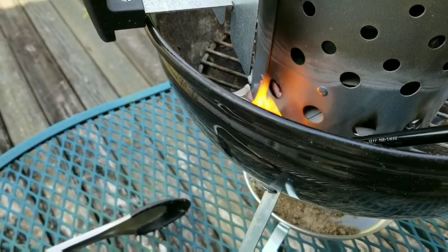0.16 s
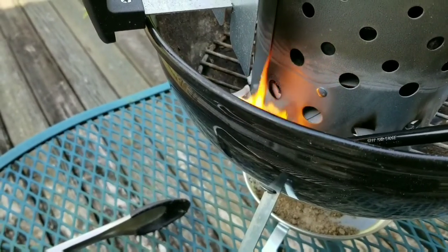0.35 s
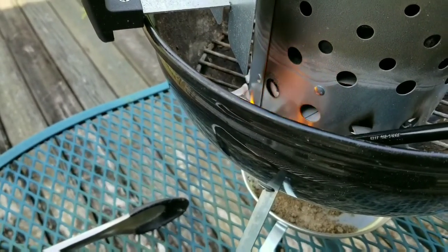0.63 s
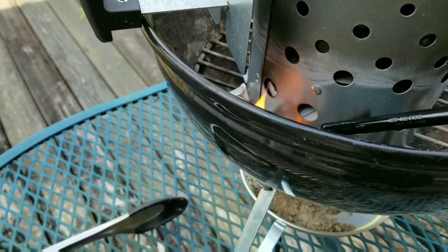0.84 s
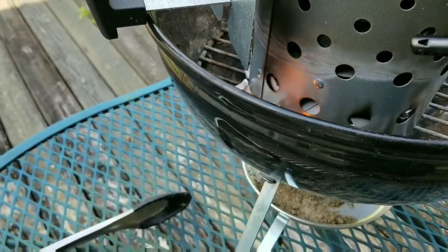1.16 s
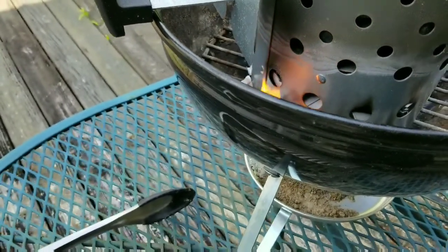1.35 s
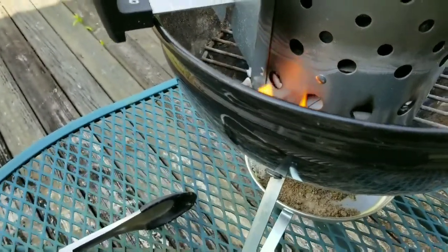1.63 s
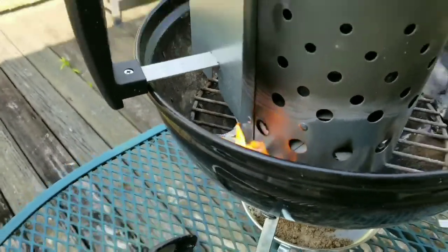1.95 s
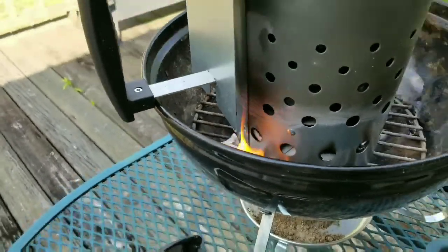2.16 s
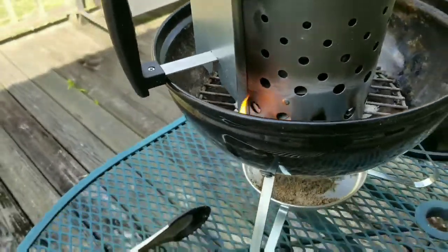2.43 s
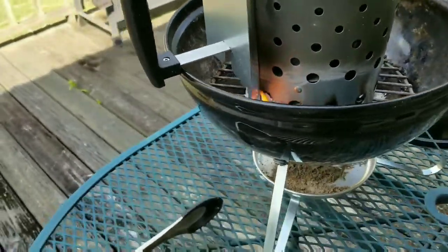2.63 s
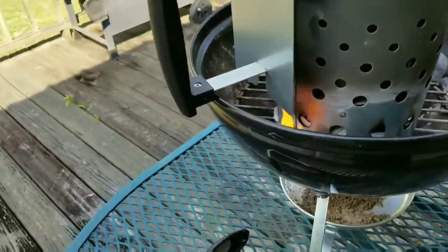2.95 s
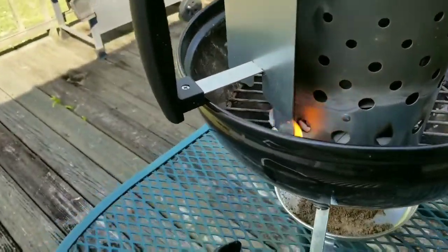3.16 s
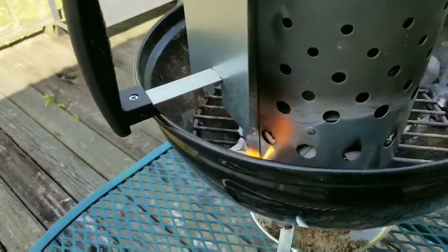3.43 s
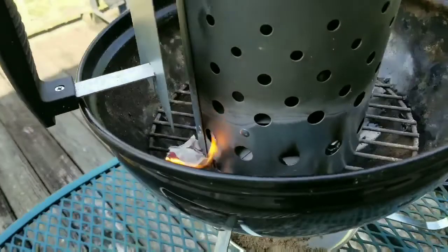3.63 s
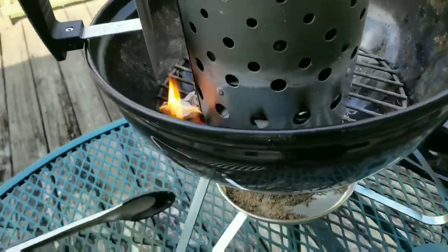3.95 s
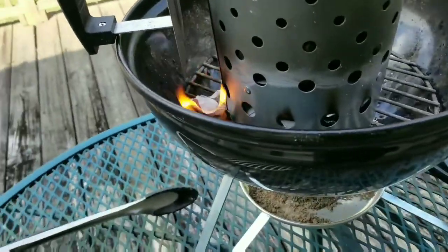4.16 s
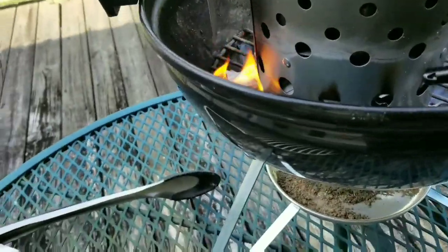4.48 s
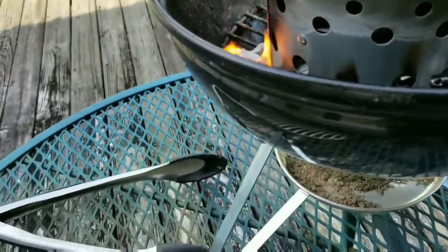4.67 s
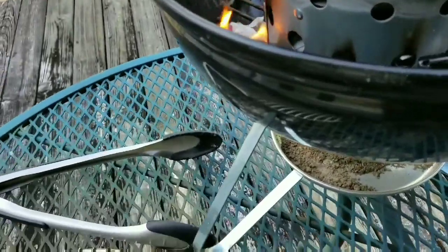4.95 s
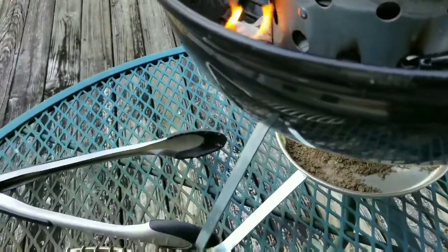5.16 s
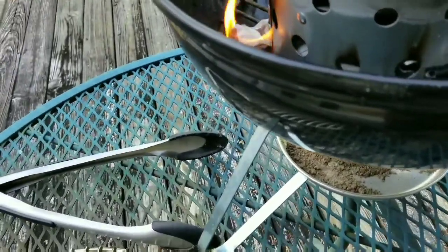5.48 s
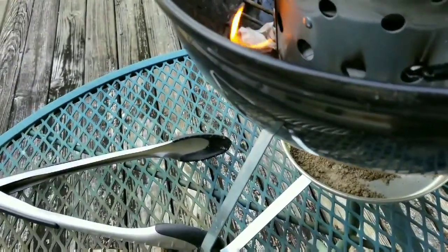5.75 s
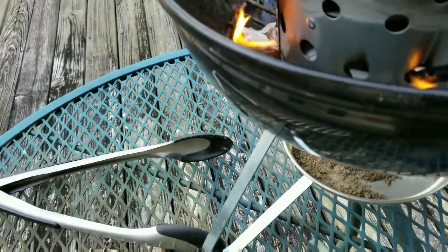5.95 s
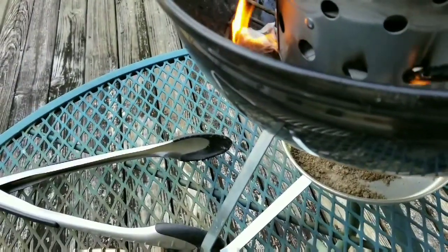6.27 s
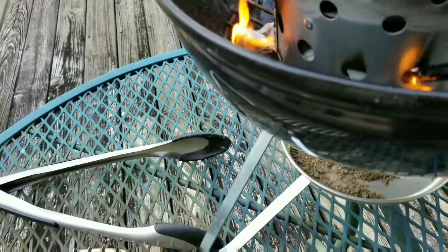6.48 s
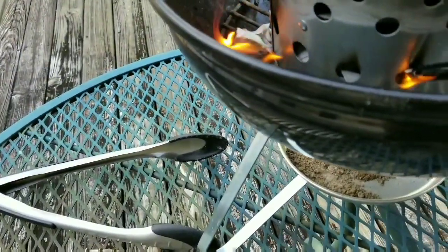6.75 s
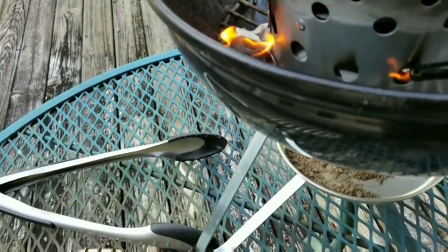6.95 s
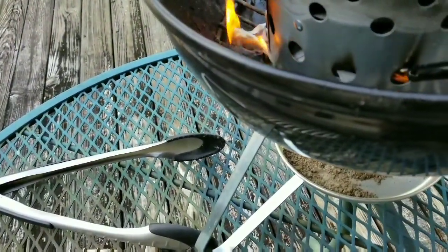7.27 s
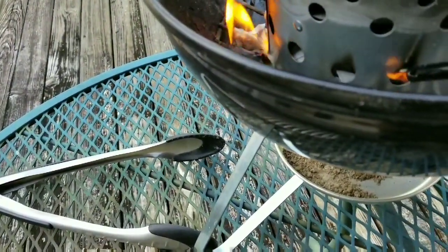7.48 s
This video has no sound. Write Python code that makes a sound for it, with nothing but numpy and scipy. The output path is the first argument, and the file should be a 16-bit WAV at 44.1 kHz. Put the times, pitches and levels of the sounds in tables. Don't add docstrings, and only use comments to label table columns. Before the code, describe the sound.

Close outdoor stereo on a deck, with a far fan's low unsteady hum and thin hiss. From 0.2 to 0.95 s burning paper crackles: sharp dry snaps at 0.46 and 0.58, the loudest at 0.64, another at 0.81, each with a brief diffuse tail. It then stays quiet, with a dull tick at 1.76 and faint cloth rustles around 1.8 to 2.5. A strong crack lands at 3.2, small crackles follow, and from 4.1 to 4.85 they cluster densely. Wind arrives at about 4.6, thumping low and irregularly, mostly on the right. A lighter taps the steel chimney at 4.85 with a short bright ring, lightly at 5.4, and with a hard dull knock at 5.83. The hum drops after 4.9. From 6 s only tiny ember ticks and buffeting remain, with a lull at 7 and gusts returning to the end at 7.6.

```python
import sys
import numpy as np
from scipy import signal
from scipy.fft import rfft, irfft, next_fast_len
from scipy.io import wavfile
from scipy.ndimage import uniform_filter1d, map_coordinates

SR = 44100
rng = np.random.default_rng(int(sys.argv[2]) if len(sys.argv) > 2 else 0)


def convert_level_to_amplitude(level_db):
    exponent = np.asarray(level_db, float) / 20
    return 10 ** exponent


def put_to_file(sound):
    columns = np.atleast_2d(sound).T
    safe = np.clip(columns, -1, 1)
    whole_steps = np.round(safe * 32767)
    wavfile.write(sys.argv[1], SR, whole_steps.astype(np.int16))


N = 335601

# start in seconds, ring level in dB, knock level in dB,
# tilt of the ring in dB per octave.
STROKES = [
    (4.848, -45, -34, -1),
    (5.832, -45.5, -23, -1.5),
    (5.394, -52, -54, -2),
]
# time in seconds, level in dB.
BREEZE_LEVEL = [
    (4.4, -88),
    (4.65, -37),
    (4.9, -40),
    (6, -42.5),
    (6.8, -43.5),
    (7, -53.5),
    (7.3, -44),
    (7.61, -38),
]
# frequency in Hz, width in Hz, gain in dB.
PORT_MODES = [(3940, 200, -2.5), (8100, 470, -2.5), (12260, 350, 8)]


def unit(x):
    return x / np.sqrt(np.mean(x ** 2) + 1e-20)


def along(points, hz):
    f, v = np.transpose(points)
    return np.interp(np.log(hz + 1), np.log(f + 1), v)


def curve(rows, column=1):
    rows = np.array(rows)
    return np.interp(np.arange(N) / SR, rows[:, 0], rows[:, column], left=-150, right=-150)


def wobble(rate):
    knots = rng.standard_normal(int(N * rate / SR) + 4)
    return map_coordinates(knots, [np.arange(N) * rate / SR])


def filtered(x, response):
    n = x.shape[-1]
    m = next_fast_len(n + 4096)
    return irfft(rfft(x, m) * response(np.fft.rfftfreq(m, 1 / SR)), m)[..., :n]


def causal(gain):
    cepstrum = irfft(np.log(gain + 1e-6))
    half = len(cepstrum) // 2
    cepstrum[1:half] *= 2
    cepstrum[half + 1:] = 0
    return np.exp(rfft(cepstrum))


def peak(f, hz, width):
    return 1j * f * width / (hz * hz - f * f + 1j * f * width)


def rush(gain, alike, patchy_db=0):
    pair = rng.standard_normal((2, N))
    if patchy_db:
        z = signal.stft(pair, nperseg=512)[2]
        field = uniform_filter1d(rng.standard_normal(z.shape[1:]), size=6, axis=0)
        field = uniform_filter1d(field, size=12, axis=1)
        pair = signal.istft(z * convert_level_to_amplitude(patchy_db * unit(field)), nperseg=512)[1][:, :N]

    def mid_side_gain(hz):
        turn = np.arccos(np.clip(along(alike, hz), -1, 1)) / 2
        return gain(hz) * [np.cos(turn), np.sin(turn)]

    mid, side = filtered(pair, mid_side_gain)
    return unit(np.array([mid + side, mid - side]))


def add(out, s, sound):
    at = round(s * SR)
    out[..., at:at + sound.shape[-1]] += sound[..., :N - at]


def from_fire(sound, own, share=0.46):
    # frequency in Hz, level in dB.
    shadow_gain = [(1200, 0.5), (2500, -4), (12000, -6.5)]
    share = np.clip(share, 0, 1)
    mixed = share * sound + np.sqrt(1 - share ** 2) * own
    late = np.pad(mixed, (19, 0))[:len(sound)]
    return np.array([filtered(late, lambda f: convert_level_to_amplitude(along(shadow_gain, f))), sound])


def even(burst):
    lines = rfft(burst)
    return irfft(lines * causal(uniform_filter1d(abs(lines) ** 2, size=16) ** -.5))


def snaps():
    # start in seconds, peak in dB, ringing in Hz, brightness in dB, body in dB.
    loud_snaps = [(0.4578, -16, 2300, 2, 3), (0.5822, -25, 3200, -6, -6.5), (0.6413, -5, 3300, -4, -4),
                  (0.81, -18, 2250, -2, -4), (3.215, -10.5, 2270, 3, -3), (4.093, -26, 8180, -4.5, -10),
                  (4.2095, -23, 5900, -3, -11), (4.3304, -18, 3730, -4.5, -8), (4.4306, -26, 3210, -3, -6),
                  (4.435, -22, 2460, 0, -6), (4.4797, -27, 4100, 0.5, 1), (4.5979, -15, 2700, 0, -7.5),
                  (4.7238, -19, 3420, -3.5, -5), (4.7394, -22.5, 3040, 2, -7), (4.7575, -28, 3340, -5, 0),
                  (4.7797, -26.5, 3510, -6, -7), (4.791, -28, 2260, -2, 2), (4.83, -27, 3680, -3, -1),
                  (4.8336, -26, 8290, -2.5, -3), (4.848, -11, 7300, -0.5, -8), (5.3943, -29, 3100, -12, -8),
                  (5.4821, -18.5, 2170, -3, -11), (5.8321, -13.5, 8100, 4, -6), (1.7575, -34, 1900, -20, 4)]
    # start in seconds, peak in dB, ringing in Hz, brightness in dB.
    small_crackles = [(0.2091, -36.5, 4040, -2), (0.5117, -29, 2370, -6), (0.526, -29, 2760, -6),
                      (0.5363, -32, 2860, -7), (0.566, -33, 2890, -16), (0.6187, -39, 3170, -16),
                      (0.7226, -42, 6000, -3), (0.8165, -36, 2300, -8), (0.915, -32.5, 2200, -10),
                      (0.946, -40, 7200, 1.5), (2.1326, -45, 2000, -12), (3.303, -36, 1900, -8),
                      (3.3632, -41.5, 3450, -7), (3.3888, -38, 5000, -3), (3.782, -38, 2710, -8),
                      (3.9562, -40, 2450, -8), (3.987, -40.5, 2500, -8), (4.1125, -43, 6500, 0),
                      (4.121, -39, 2280, -8), (4.139, -41, 7500, 0), (4.1675, -37, 3550, -4),
                      (4.1926, -33, 3800, -10), (4.1955, -34, 3900, -10), (4.2187, -40, 7560, 0),
                      (4.3075, -40, 1920, -12), (4.3345, -26, 7900, -2), (4.358, -42, 8200, 3),
                      (4.6912, -32, 2500, -2), (4.7102, -32.5, 2350, -6), (4.7305, -33, 2400, -14),
                      (5.3611, -35.5, 2260, -3), (5.3735, -33, 3420, -4), (5.383, -43, 4000, -6),
                      (5.3975, -30, 3074, -14), (5.401, -33, 3074, -14), (5.4165, -40, 8500, 2),
                      (5.489, -39, 1500, -16), (5.5104, -39, 4260, -4), (5.5627, -48, 2470, -12),
                      (5.6985, -48, 8000, 0), (5.7026, -33, 1950, -3), (5.7722, -40, 2090, -5),
                      (5.8135, -47, 2170, -10)]
    # frequency in Hz, density in dB per Hz.
    snap_spectrum = [(290, -34), (600, -8), (1100, 0.5), (1600, -2.5), (2300, -0.5), (3700, -2), (6000, -6),
                     (8100, -1), (9200, -7.5), (13800, -4.5), (16200, -10), (16700, -71)]
    # frequency in Hz, t60 in seconds.
    answer_t60 = [(600, 0.22), (2000, 0.24), (6000, 0.24), (15000, 0.18)]
    # frequency in Hz, gain in dB.
    answer_tone = [(800, 0), (1150, -5), (1600, 1.5), (2500, 0.5), (9000, -4), (15700, -3.5), (15900, -40)]
    crackle_body_db, crackle_scatter_db = -.5, 2.5
    hold_s, crack_t60_s, rattle_t60_s, rattle = .0014, .011, .03, .1
    answer_db, answer_growth, steel_answer_db = -48, 0.56, 9.5

    out, t = np.zeros((2, N)), np.arange(9216) / SR
    body = crackle_body_db + crackle_scatter_db * rng.standard_normal(len(small_crackles))
    rows = list(loud_snaps) + [(*row, body_db) for row, body_db in zip(small_crackles, body)]

    f, frames, z = signal.stft(rng.standard_normal((len(rows), 2, len(t))), SR, nperseg=256)
    held_s = .045
    fade = convert_level_to_amplitude(-60 * np.maximum(frames - held_s, 0) / along(answer_t60, f)[:, None])
    answers = signal.istft(z * fade, SR, nperseg=256)[1][..., :len(t)]
    answers = answers * (1 - np.exp(-t / .007))

    u = t[:2048]
    after = np.maximum(u - hold_s, 0)
    shape = convert_level_to_amplitude(-60 * after / crack_t60_s) + rattle * convert_level_to_amplitude(-60 * after / rattle_t60_s)
    shape = shape + 1.6 * convert_level_to_amplitude(-60 * u / .003)
    shape = shape * (1 - np.exp(-u / .0001))
    size = (len(rows), 2, len(u))
    spikes = convert_level_to_amplitude(3 * rng.standard_normal(size))
    bursts = rng.standard_normal(size) * spikes * shape

    for (s, db, hz, bright_db, body_db), burst, answer in zip(rows, bursts, answers):
        on_steel = min(abs(s - stroke[0]) for stroke in STROKES) < .004
        tilt = [(700, body_db + 11), (1150, body_db + 8), (1500, body_db + 3), (1900, 0.00092),
                (3200, 0), (9000, 1.2 * bright_db + 3)]

        def own_ring(f):
            return abs(peak(f, hz, 0.11 * hz))

        def colour(f):
            return convert_level_to_amplitude(along(snap_spectrum, f)) * convert_level_to_amplitude(along(tilt, f)) * (1 + 1.9 * own_ring(f))

        def answer_colour(f):
            return colour(f) * convert_level_to_amplitude(along(answer_tone, f)) / (1 + 1.3 * own_ring(f))

        burst = filtered(np.array([even(b) for b in burst]), lambda f: causal(colour(f)))
        add(out, s, convert_level_to_amplitude(db + .5) * from_fire(*burst) / abs(burst).max())
        answer = filtered(answer, answer_colour)
        level_db = answer_db + answer_growth * db + steel_answer_db * on_steel
        add(out, s, convert_level_to_amplitude(level_db) * answer / answer[:, :2048].std())
    return out


def ticks():
    # start in seconds, peak in dB, frequency in Hz.
    ember_ticks = [(6.0104, -57, 12200), (6.0352, -60, 3570), (6.0496, -57, 13000), (6.0604, -58, 5610),
                   (6.0934, -60, 12200), (6.136, -58, 13000), (6.2238, -57, 14000), (6.2522, -53, 14400),
                   (6.2604, -53, 4300), (6.3126, -58, 3810), (6.3464, -60, 3670), (6.3684, -56, 4560),
                   (6.3744, -57, 3960), (6.4991, -53, 4750), (6.5114, -52, 3840), (6.5504, -63, 7640),
                   (6.5874, -54, 13000), (6.5989, -42, 13000), (6.6248, -54, 13100), (6.6513, -61, 12600),
                   (6.8977, -64, 12400), (7.0115, -58, 13900), (7.0618, -60, 12900), (7.0764, -60, 14000),
                   (7.0918, -58, 11100), (7.1034, -64, 12600), (7.1796, -58, 3860), (7.226, -55, 12900),
                   (7.2744, -54, 12700), (7.2874, -55, 7800), (7.3054, -61, 4360), (7.3317, -60, 3800),
                   (7.3554, -65, 12200), (7.3931, -64, 12200), (7.442, -52, 13700), (7.4584, -62, 3780),
                   (7.4844, -59, 12900), (7.5114, -64, 3590), (7.5542, -60, 12500), (7.5644, -65, 12200)]
    out, t = np.zeros((2, N)), np.arange(512) / SR
    for s, db, hz in ember_ticks:
        def colour(f):
            return (peak(f, hz, .3 * hz) + 0.6 * peak(f, 10000, 9000)) * peak(f, 8100, 12000) * (f < 16000)

        tick = filtered(rng.standard_normal((2, len(t))) * convert_level_to_amplitude(-60 * t / .012), colour)
        add(out, s + .0008, convert_level_to_amplitude(db + 4) * tick / abs(tick).max())
    return out


def steel():
    # frequency in Hz, level in dB, t60 in seconds.
    wall_modes = [(1690, -5.5, .55), (1825, -8, .14), (2083, -8, .26), (2202, -8, .14), (2462, -2, .3),
                  (3074, -4, .19), (3590, -5, .13), (3704, -6, .14), (4075, -11, .22), (4786, -8, .14),
                  (5265, -8, .16), (5615, -12, .19), (6850, -7, .14), (7348, -5, .15), (8037, -12, .18),
                  (9600, -15, .2), (10220, -12, .15), (11500, -14, .17)]
    beat_hz, beat_depth = 3, .6
    out, t = np.zeros((2, N)), np.arange(SR // 3) / SR
    for s, db, knock_db, tilt_db in STROKES:
        for hz, level_db, t60 in wall_modes:
            phase = rng.uniform(0, 2 * np.pi) + rng.normal(0, .6, (2, 1))
            scatter_db = rng.normal(0, 1.5, (2, 1))
            drift = np.cumsum(rng.normal(0, .024, len(t)))
            ring = np.sin(2 * np.pi * hz * t + phase + drift) * (1 - np.exp(-t / .003))
            ring *= 1 + beat_depth * np.cos(2 * np.pi * beat_hz * t)
            start_db = db + level_db + tilt_db * np.log2(hz / 2500) + scatter_db
            add(out, s, convert_level_to_amplitude(start_db - 60 * t / t60) * ring)
        thud = rng.standard_normal((2, len(t))) * convert_level_to_amplitude(-60 * t / .06)
        thud = filtered(thud, lambda f: peak(f, 360, 705) ** 2)
        add(out, s, convert_level_to_amplitude(knock_db) * convert_level_to_amplitude([[-6], [0]]) * thud / abs(thud).max())
    return out


def rustles():
    # centre in seconds, length in seconds, level in dB, tilt in dB from band to band.
    cloth_swells = [(0.027, 0.03, -89, -5), (1.52, .04, -74, 0), (1.805, 0.025, -59, -6.5),
                    (1.878, .04, -72, -4), (2.109, 0.045, -68, -6), (2.318, 0.039, -71, 6),
                    (2.418, 0.027, -62.5, 4), (2.515, 0.04, -69, -9), (3.064, 0.036, -65, -2),
                    (3.36, 0.053, -72, -1), (3.62, 0.04, -76, -10), (3.75, 0.043, -67, -0.5),
                    (3.845, 0.03, -59, -5), (3.95, 0.043, -69.5, -4), (4.145, 0.012, -76, -14),
                    (4.29, 0.036, -68, -3), (4.38, 0.05, -65.5, 0.5), (4.48, 0.053, -62, -3),
                    (4.625, 0.02, -62, -10), (4.56, .04, -68, 0), (4.145, .03, -70, -1),
                    (5.248, 0.12, -82.5, -10.5), (6.05, 0.056, -76.5, -1), (6.298, 0.072, -79, 3),
                    (6.518, .02, -78, -3)]
    # band centre in Hz, width in Hz.
    cloth_bands = [(1400, 1350), (4000, 5100), (11000, 9000)]
    out, t = np.zeros((2, N)), np.arange(N) / SR
    coarse = t[::64]
    swells = np.array([np.exp(-.5 * ((coarse - s) / length) ** 2) for s, length, *_ in cloth_swells])
    level_db, tilt_db = np.transpose(cloth_swells)[2:]
    for step, (hz, width) in enumerate(cloth_bands):
        gain = np.interp(t, coarse, convert_level_to_amplitude(level_db + (step - 1) * tilt_db) @ swells)
        band = rush(lambda f: abs(peak(f, hz, width)) ** 2 * (f < 15800), [(1000, 0.25)], patchy_db=2.5)
        out += gain * band
    return convert_level_to_amplitude(2.4 * wobble(40) + 2.2 * wobble(300) - .7) * out


def scrape():
    # centre in seconds, length in seconds, level in dB.
    sleeve_rubs = [
        (1.79, .03, -70),
        (2.09, .025, -70),
        (2.16, .03, -74),
        (2.47, .02, -76),
        (2.55, .04, -74),
        (3.84, .04, -76),
        (4.455, .018, -59),
        (4.53, .04, -70),
        (5.42, .02, -63),
    ]
    slide = [(4.98, -82), (5.36, -74)]
    t = np.arange(0, N, 64) / SR
    rubs = sum(convert_level_to_amplitude(db) * np.exp(-.5 * ((t - s) / length) ** 2) for s, length, db in sleeve_rubs)
    level = convert_level_to_amplitude(curve(slide)) + np.interp(np.arange(N) / SR, t, rubs)
    hiss = rush(lambda f: abs(peak(f, 2200, 800)) ** 3, [(1000, .3)], patchy_db=3)
    return level * convert_level_to_amplitude(2.2 * wobble(30)) * hiss


def eddies():
    # centre in seconds, peak in dB, frequency in Hz, length in seconds.
    strong = [(4.632, -27, 55, .024), (4.685, -25.5, 71, .017), (4.727, -27.5, 79, 0.024),
              (4.77, -27, 107, .013), (4.799, -15.5, 87, 0.018), (4.858, -22.5, 60, 0.028),
              (4.953, -29.5, 97, .012), (5.147, -28, 98, 0.016), (5.199, -15.5, 105, 0.014),
              (5.395, -29, 66, 0.022), (5.491, -23, 87, 0.025), (5.536, -23, 99, 0.01),
              (5.557, -25, 85, .017), (5.66, -28, 94, 0.022), (5.733, -26, 90.6, .045),
              (5.843, -16.5, 61, .02), (5.921, -25, 97.5, 0.016), (6.206, -27.5, 74, .013),
              (6.33, -20, 83, 0.0084), (6.35, -20.5, 90, 0.035), (6.387, -23.5, 85, 0.019),
              (6.493, -21, 79.3, 0.038), (6.606, -25.5, 82, 0.014), (6.742, -26, 72.8, 0.024),
              (6.767, -28, 85, 0.012), (7.308, -32, 93, .015), (7.332, -30.5, 66, .013),
              (7.419, -21, 116, .011), (7.479, -23, 126.5, .018), (7.506, -25, 82, 0.014)]
    count, per_s, over_breeze_db, middle_hz = 21, 7, 6.5, 85
    cycles = 1.3
    chance = rng.standard_normal((count, 3))
    s = BREEZE_LEVEL[0 + 1][0] + (np.arange(count) + .3 * chance[:, 0]) / per_s
    s = np.clip(s, 0, N / SR)
    db = np.interp(s, *np.transpose(BREEZE_LEVEL)) + over_breeze_db + 2.5 * chance[:, 1]
    hz = middle_hz * np.exp(0.18 * chance[:, 2])
    return list(strong) + list(zip(s, db, hz, cycles / hz))


def thumps(rows):
    out, t = np.zeros(N), np.arange(-2500, 2500) / SR
    for s, db, hz, length in rows:
        bend = 1 + 500 / hz * rng.normal() * t
        turn = 2 * np.pi * hz * t * bend - np.pi / 2 + .45 * rng.normal()
        steep = np.clip((db + 35.5) / 40, 0, .9)
        flutter = unit(filtered(rng.standard_normal(len(t)), lambda f: peak(f, 191, 190) ** 2))
        push = np.sin(turn + steep * np.sin(turn)) + 0.21 * steep * flutter
        add(out, s + t[0], convert_level_to_amplitude(db) * np.exp(-.5 * (t / (0.39 * length)) ** 2) * push)
    return out


def wind():
    # centre in seconds, peak in dB, frequency in Hz, length in seconds.
    left_eddies = [
        (5.245, -37, 81, 0.016),
        (5.394, -33, 69, 0.028),
        (5.847, -37, 228.5, 0.016),
        (6.745, -34.5, 61, 0.044),
        (6.801, -34, 99, 0.02),
        (6.891, -38, 72, 0.019),
    ]
    quick_eddies = [
        (5.465, -28, 169, 0.021),
        (5.76, -32, 179, 0.021),
        (7.45, -30, 140, 0.019),
        (7.611, -20, 90, 0.012),
    ]
    soft_bump = [
        (4.39, -43.5, 290, .03),
    ]
    # frequency in Hz, density in dB per Hz.
    bed_spectrum = [(15, -34), (40, -3), (70, 0.5), (150, -9), (300, -24), (600, -60), (1500, -120)]
    bed = rush(lambda f: convert_level_to_amplitude(along(bed_spectrum, f)), [(30, 0)])
    bed = convert_level_to_amplitude(curve(BREEZE_LEVEL) + 4.16 * wobble(14)) * bed
    whistle = rush(lambda f: abs(peak(f, PORT_MODES[0][0], 500)) ** 2, [(4000, .2)])
    whistle = convert_level_to_amplitude(-47 + 3 * wobble(8)) * whistle
    pushes = np.array([thumps(left_eddies), thumps(eddies() + list(quick_eddies))])
    flow = uniform_filter1d(abs(pushes), size=441)
    return pushes + flow * whistle + thumps(soft_bump) + bed * convert_level_to_amplitude([[-18], [0]])


def background():
    # time in seconds, gain in dB.
    recorder_gain = [
        (0, 1),
        (2.5, 0),
        (4.84, -0.5),
        (4.92, -7),
        (6, -8.5),
        (7.61, -9),
    ]
    # frequency in Hz, density in dB per Hz.
    fan_spectrum = [(15, -40.5), (25, -14), (54, -4), (129, -4), (240, -11.5), (294, -15.5), (352, -14),
                    (421, -18), (580, -17), (709, -12), (2510, -42.5), (3000, -52), (3900, -81.5),
                    (6600, -120)]
    # frequency in Hz, width in Hz, top in dB.
    blade_orders = [(60.4, 9, 0.5), (117.4, 9, -2), (236.7, 7.1, -11), (710.7, 14, -14)]
    # frequency in Hz, density in dB per Hz.
    hiss_spectrum = [(1200, -30.5), (2000, -8), (3300, -5.5), (5440, -6.5), (9330, -10), (14000, -7),
                     (15700, -7.5), (15900, -60.5)]
    # frequency in Hz, left-right likeness.
    likeness = [(60, 0.94), (150, 0.98), (380, 0.58), (950, 0.0035), (2380, -0.26), (5980, -0.05),
                (15000, -0.02)]
    whine_db, beat_s, beat_db = -60.5, 1.12, 3.5
    fades_s, fade_db_per_s, least_db = 2.4, 6, -73.5

    def orders(f):
        return sum(convert_level_to_amplitude(db) * abs(peak(f, hz, width)) ** 2 for hz, width, db in blade_orders)

    def port(f):
        modes = sum(convert_level_to_amplitude(db) * abs(peak(f, hz, width)) for hz, width, db in PORT_MODES)
        return convert_level_to_amplitude(along(hiss_spectrum, f)) * (1 + modes)

    gain_db = curve(recorder_gain)
    fan = rush(lambda f: convert_level_to_amplitude(along(fan_spectrum, f)), likeness, patchy_db=1.28)
    fan = convert_level_to_amplitude(-45.5 + .8 * wobble(3.01)) * fan
    hum = convert_level_to_amplitude(-47) * rush(orders, likeness)
    t = np.arange(N) / SR
    fading_db = np.maximum(whine_db - fade_db_per_s * np.maximum(t - fades_s, 0), least_db)
    whine = rush(lambda f: abs(peak(f, 356, 5)) ** 2, [(356, .9)]) * convert_level_to_amplitude([[-6], [3]])
    whine = convert_level_to_amplitude(fading_db + beat_db * np.cos(2 * np.pi * t / beat_s)) * whine
    hiss = convert_level_to_amplitude(-72 + 0.57 * gain_db) * rush(port, [(1000, .05)])
    return convert_level_to_amplitude(gain_db) * (fan + hum) + whine + hiss


def scene():
    return snaps() + ticks() + steel() + rustles() + scrape() + wind() + background()


def low_pass(x):
    return signal.sosfilt(signal.butter(12, 16660, fs=SR, output="sos"), x)


def record(dry):
    mix = filtered(dry, lambda f: f < 16600)
    return low_pass(mix)


dry = scene()
out = record(dry)
put_to_file(out)
```